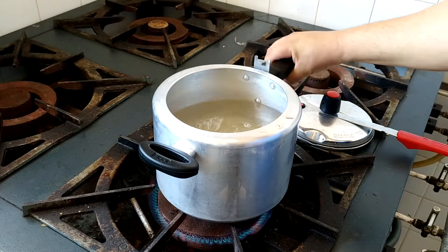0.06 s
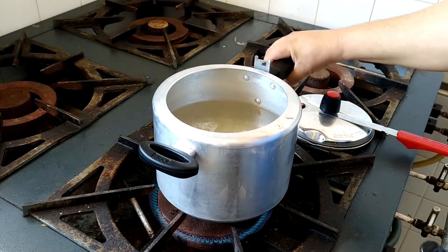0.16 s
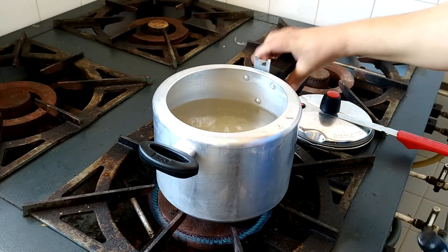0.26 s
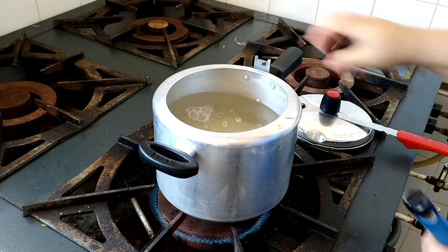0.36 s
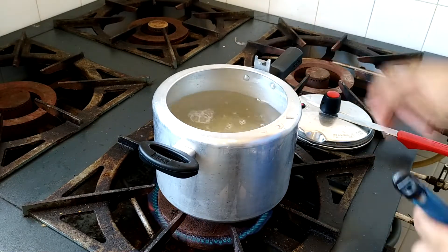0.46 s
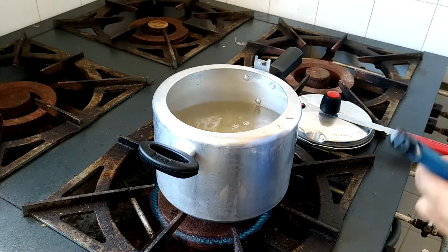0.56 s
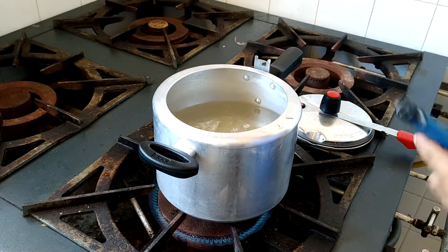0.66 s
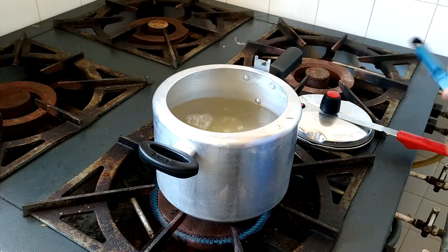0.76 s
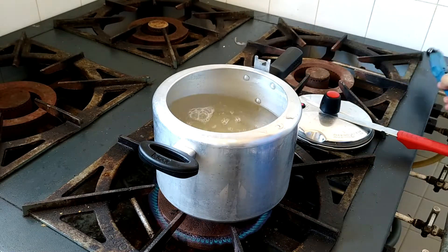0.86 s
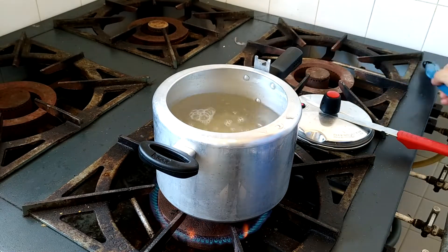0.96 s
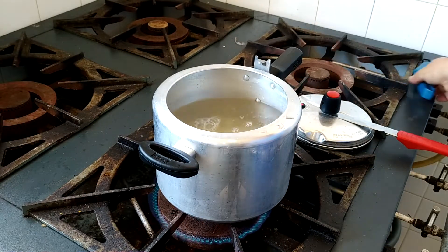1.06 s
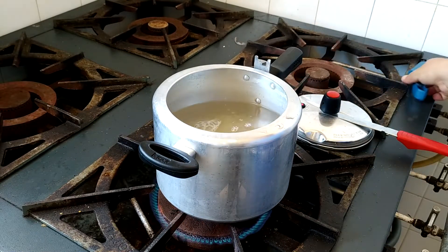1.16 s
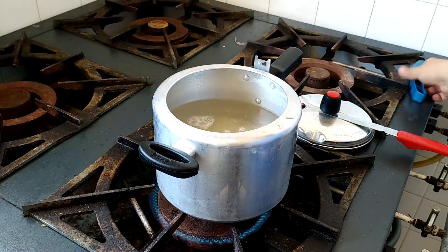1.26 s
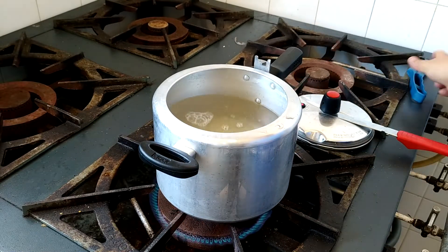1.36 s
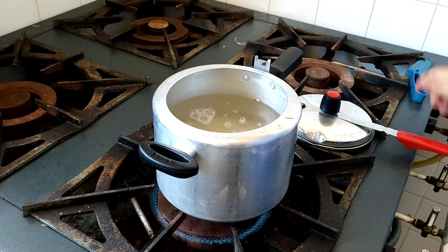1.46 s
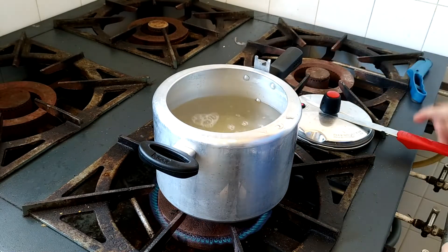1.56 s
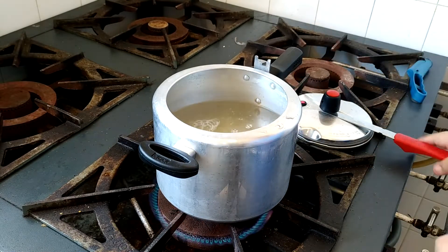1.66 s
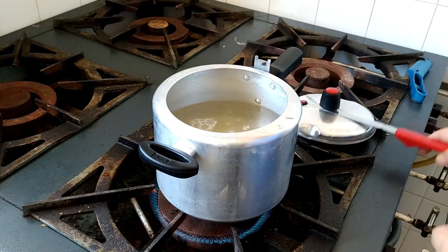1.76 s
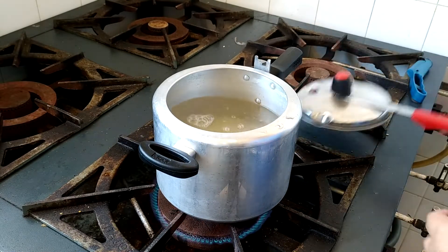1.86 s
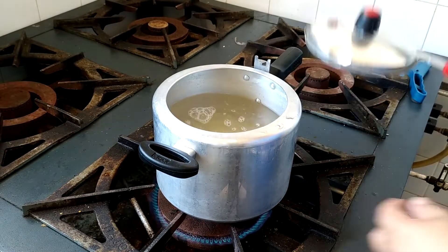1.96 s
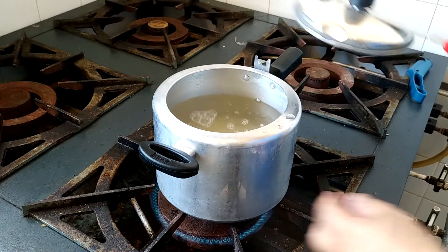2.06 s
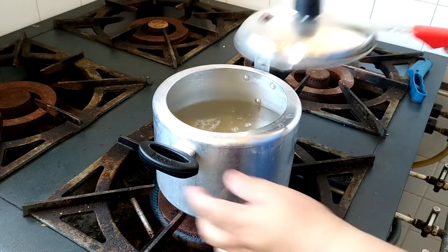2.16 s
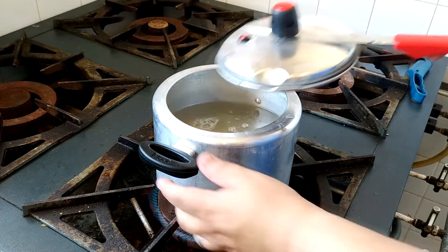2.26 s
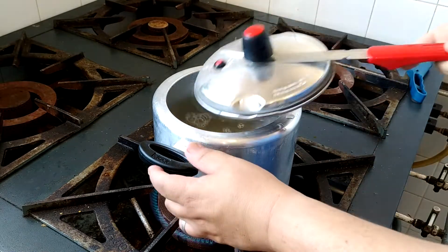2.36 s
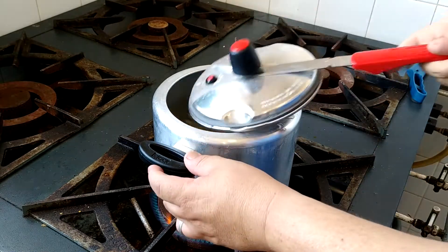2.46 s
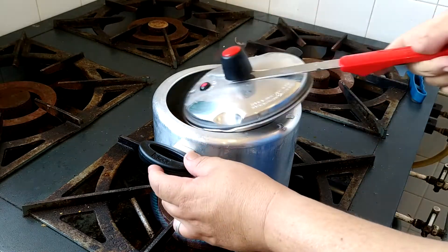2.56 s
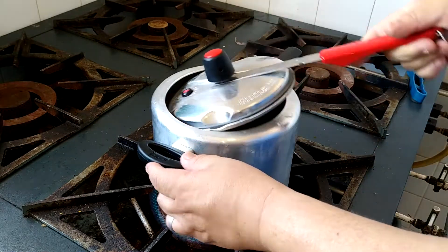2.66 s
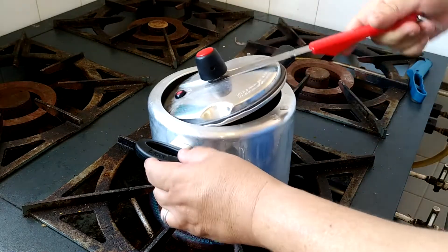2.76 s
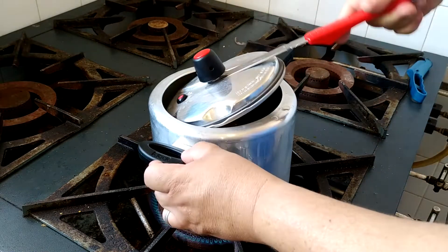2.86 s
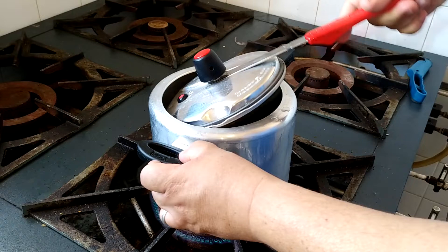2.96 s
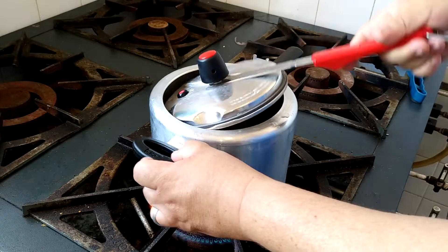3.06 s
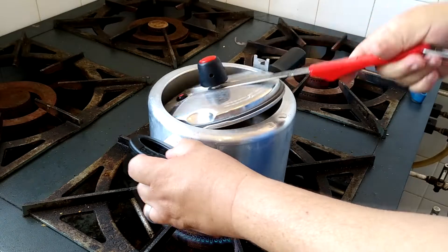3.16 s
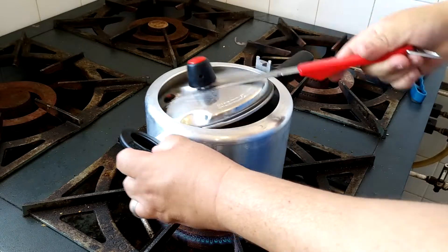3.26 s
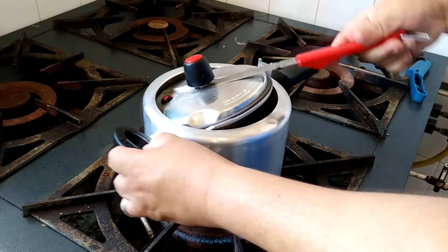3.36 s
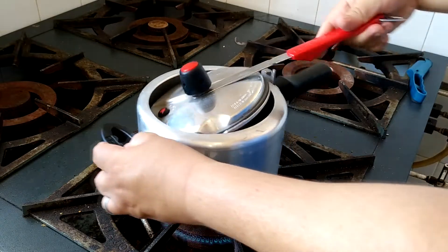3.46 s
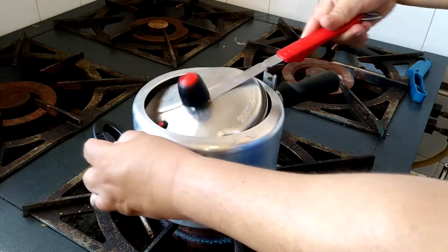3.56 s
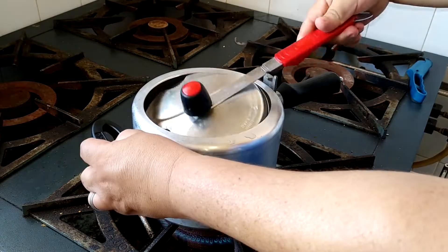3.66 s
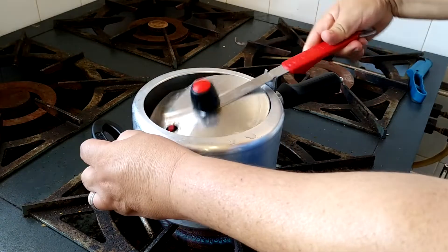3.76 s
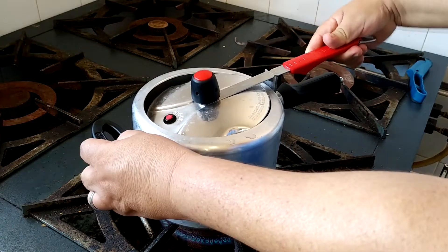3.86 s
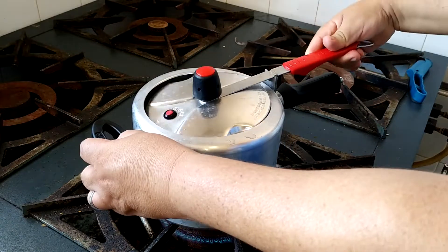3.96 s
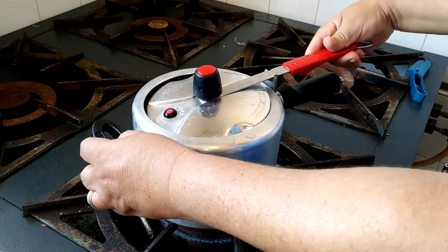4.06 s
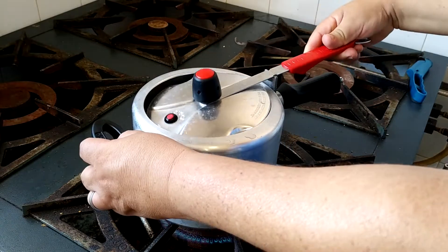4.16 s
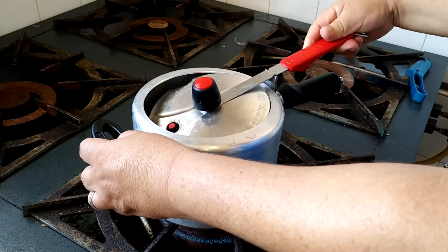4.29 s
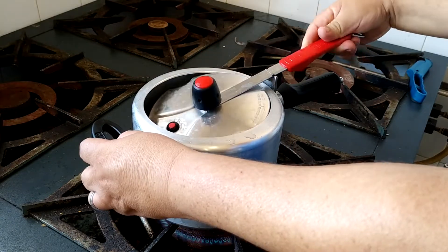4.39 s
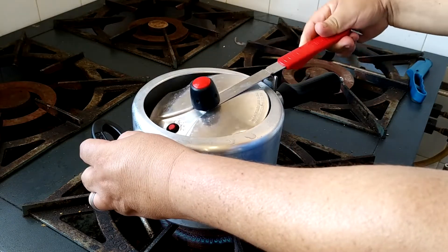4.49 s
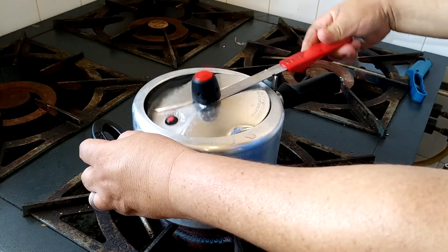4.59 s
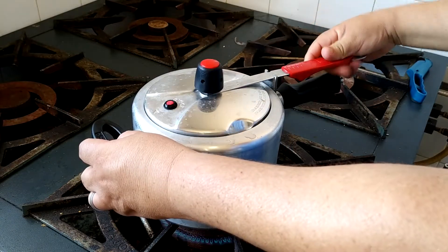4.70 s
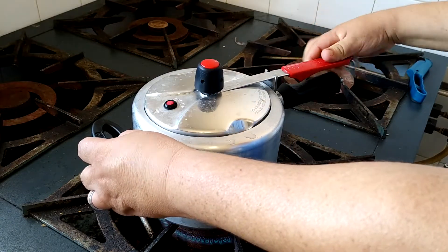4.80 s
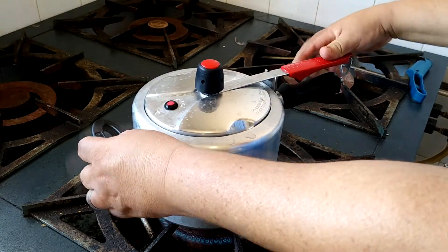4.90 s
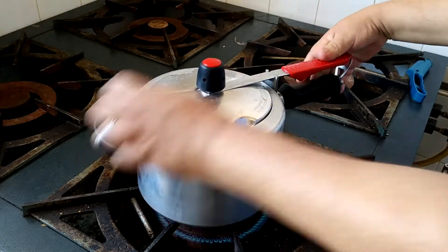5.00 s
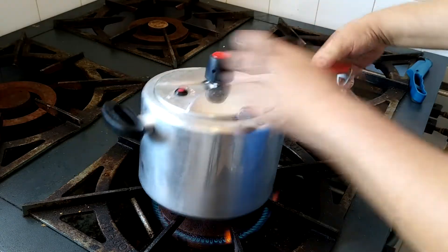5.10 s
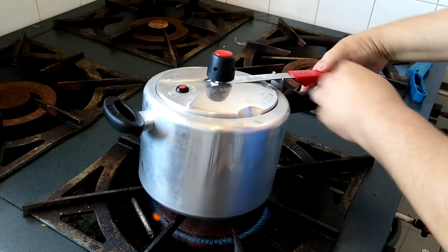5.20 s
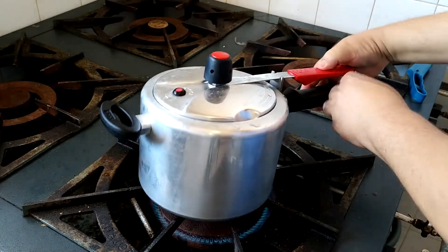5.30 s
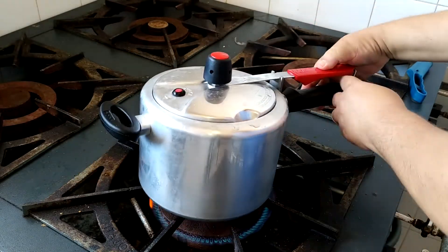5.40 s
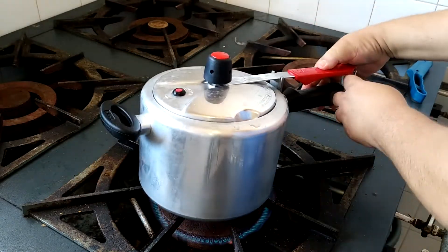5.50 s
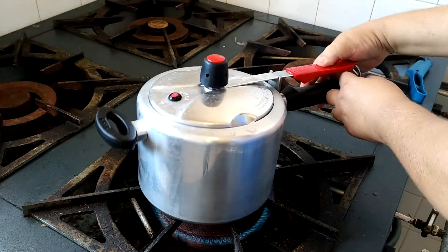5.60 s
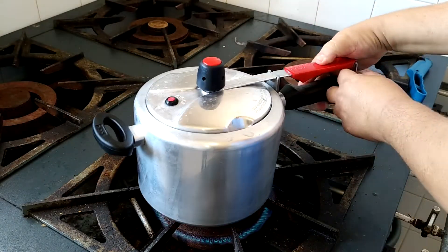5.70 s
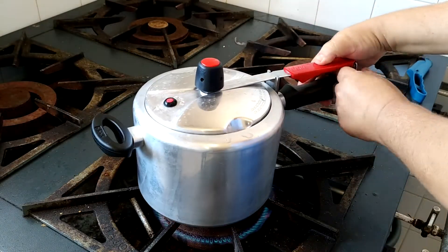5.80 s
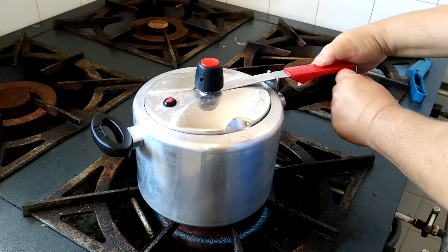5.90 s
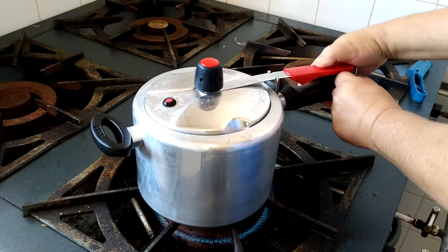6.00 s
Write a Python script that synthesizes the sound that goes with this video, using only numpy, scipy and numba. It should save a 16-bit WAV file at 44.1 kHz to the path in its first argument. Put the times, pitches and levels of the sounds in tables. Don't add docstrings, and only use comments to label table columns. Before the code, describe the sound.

Metal pressure cooker lid clanks and grates against its pot rim, drops into place and is latched, over soft flame hiss in an echoing kitchen.

```python
import sys
import numpy as np
from scipy import signal
from scipy.io import wavfile
from numba import njit

SR = 44100
rng = np.random.default_rng(int(sys.argv[2]) if len(sys.argv) > 2 else 0)


def digitize_waveform(pressure):
    field = np.atleast_2d(pressure).T
    bounded = np.clip(field, -1, 1)
    quanta = np.round(bounded * 32767).astype(np.int16)
    wavfile.write(sys.argv[1], SR, quanta)


def natural_amplitude(level_db):
    exponent = np.asarray(level_db, float) / 20
    return 10 ** exponent


N = 266364


def unit(x):
    return x / np.sqrt(np.mean(x ** 2) + 1e-20)


def in_time(rows):
    s, *columns = np.transpose(rows)
    return np.array([np.interp(np.arange(N) / SR, s, c) for c in columns])


def at_hz(points, hz):
    points_hz, values = np.transpose(points)
    return np.interp(np.log(hz), np.log(points_hz), values)


def band(x, low_hz, high_hz):
    return signal.sosfilt(signal.butter(2, [low_hz, high_hz], "band", fs=SR, output="sos"), x)


def drift(rate_hz):
    r = np.exp(-80 * np.pi * rate_hz / SR)
    noise = rng.standard_normal(N // 40 + 2002)
    slow = signal.lfilter([1], [1, -2 * r, r * r], noise)[2000:]
    return np.interp(np.arange(N) / 40, np.arange(len(slow)), unit(slow))


def noise_bands(size):
    # pitch_hz, likeness (0 to 1)
    likeness = [(30, 0.97), (100, 0.84), (250, 0.97), (500, 0.66), (1000, 0), (4000, 0.16), (15000, 0)]
    edges = 20 * 2 ** np.arange(0, 10, .5)
    white = rng.standard_normal((2, 2, size))
    for k, (low, high) in enumerate(zip(edges, edges[1:])):
        hz = np.sqrt(low * high)
        mid, side = band(white[k % 2], low, high)
        alike = np.clip(at_hz(likeness, hz), -1, 1)
        yield hz, np.sqrt(1 + alike) * mid + np.sqrt(1 - alike) * side * [[1], [-1]]


def slide_force(start_s, length_s, level_db, ease_db, weight_db, grain_db=3.0):
    t = np.arange(N) / SR
    clicks = (rng.random(N) < 2500 / SR) * natural_amplitude(grain_db * np.minimum(rng.exponential(1, N), 4))
    clicks = clicks * rng.choice([-1, 1], N)
    edge_s = 0.045
    stroke = np.clip(np.minimum(t - start_s, start_s + length_s - t) / edge_s, 0, 1)
    easing_db = ease_db * np.clip((t - start_s) / length_s, 0, 1)
    stroke *= natural_amplitude(level_db - 28 - easing_db + 3.2 * drift(27))
    parts_db = np.array([[-1], [weight_db], [0], [-3]])
    return natural_amplitude(parts_db) * stroke * unit(clicks)


def contacts(hits, touch, slides=(), low_hz=(300, 600), upper_hz=(1720, 3500), lower_hz=(690, 2300)):
    force = np.full((4, N), 1e-18)
    *colour_db, contact_ms = touch
    age = np.arange(3000) / (max(contact_ms, .2) * SR / 1000)
    swell = np.exp(-age) * (1 - np.exp(-6 * age))
    for start_s, level_db, hard_db, weight_db in hits:
        at = round(start_s * SR)
        burst = rng.standard_normal(3000) * swell
        burst = (burst / np.linalg.norm(burst))[:N - at]
        parts_db = np.array([level_db + hard_db / 2, weight_db, level_db - hard_db, level_db + hard_db])
        force[:, at:at + 3000] += natural_amplitude(parts_db + colour_db)[:, None] * burst
    for slide in slides:
        force += slide_force(*slide)
    upper = natural_amplitude(14) * band(force[0], *upper_hz)
    low = natural_amplitude(16) * band(band(force[1], *low_hz), *low_hz)
    lower = natural_amplitude(14.5) * band(force[2], *lower_hz)
    high = natural_amplitude(8) * band(force[3], 5530, 21000)
    return upper, low, lower, high


def struck(force, modes, ring_db, crack_db):
    busy = np.flatnonzero(np.abs(force) > 1e-9)
    part = slice(busy[0], busy[-1] + SR // 2)
    out = natural_amplitude(crack_db) * np.array([np.roll(force, 1), force])
    for hz, level_db, t60_s in modes:
        r, w = natural_amplitude(-60 / (t60_s * SR)), 2 * np.pi * hz / SR
        spot = natural_amplitude(2.5 * rng.standard_normal(N // 1024 + 1)).repeat(1024)[:N]
        rung = signal.lfilter([0, np.sin(w)], [1, -2 * r * np.cos(w), r * r], (force * spot)[part])
        aim = rng.uniform(.3, 1.27)
        out[:, part] += natural_amplitude(level_db + ring_db + 3) * rung * [[np.sin(aim)], [np.cos(aim)]]
    return out


@njit
def gliding(x, w, r):
    y = np.zeros(len(x))
    for i in range(2, len(x)):
        y[i] = np.sin(w[i]) * x[i - 1] + 2 * r[i] * np.cos(w[i]) * y[i - 1] - r[i] ** 2 * y[i - 2]
    return y


def lid_on_rim():
    # start_s, level_db, hardness_db, weight_db
    rim_hits = [(2.689, -15, 1.5, -35.5), (2.747, -7.5, -0.5, -14.5), (2.863, -27, 0, -54),
                (2.938, -14.5, 3.5, -29.5), (2.989, -18.5, -2, -37), (3.057, -18.5, -1, -25),
                (3.277, -30.5, -4, -34.5), (3.327, -21, -2.5, -25.5), (3.334, -17.5, -4.5, -35),
                (3.483, -14, 2, -31), (3.521, -10.5, -2.5, -29.5), (3.609, -12, 1, -40),
                (3.648, -24.5, -6.5, -26), (3.793, -17.5, -1, -46), (3.828, -42, -10, -43)]
    # start_s, length_s, level_db, ease_db, weight_db
    rim_slides = [
        (2.76, 0.35, -31, 8, -3),
        (3.489, 0.19, -29, 6.5, -1.5),
        (3.691, 0.17, -33, 14.6, -1),
    ]
    # upper_db, low_db, lower_db, high_db, contact_ms
    rim_touch = (-12, -4, -11.5, -8.5, 2.5)
    # pitch_hz, level_db, t60_s
    tilted_lid = [(705, 1, .12), (750, -8, .1), (930, -2, .05), (1254, -2, .07), (1790, -10, .06),
                  (1990, -12, .06), (2700, -1, .05), (2910, -8, .05), (3887, -10, .04), (4608, -10, .04)]
    upper, low, lower, high = contacts(rim_hits, rim_touch, rim_slides, low_hz=(260, 620))
    force = upper + lower + high + natural_amplitude(-18.5) * low
    return struck(force, tilted_lid, ring_db=-28, crack_db=19.0), low


def lid_seating():
    # start_s, level_db, hardness_db, weight_db
    seat_hits = [(3.973, -10, 2, -21.5), (3.992, -3.5, 0.5, -17.5), (4.005, -16, -2, -27.5),
                 (4.02, -21, 3, -28), (4.819, -11.5, 0, -28), (4.848, -24.5, 3, -31), (4.894, -19, -2, -30),
                 (4.919, -34, -1.5, -23), (4.934, -18, 4, -27.5)]
    # start_s, length_s, level_db, ease_db, weight_db
    seat_slides = [
        (3.978, 0.095, -26.5, 5.2, -9.5),
        (4.828, 0.182, -37.5, 12, -4),
    ]
    # upper_db, low_db, lower_db, high_db, contact_ms
    seat_touch = (-6.5, -8.5, -6.5, -5, 2.5)
    # pitch_hz, level_db, t60_s
    seated_lid = [(721, -8, .06), (840, -6, .06), (1110, -6, .07), (1480, -8, .07), (1583, -7, .07),
                  (1930, -1, .12), (2700, -12, .04), (2961, -5, .05), (3828, -12, .04), (4635, -12, .04)]
    upper, low, lower, high = contacts(seat_hits, seat_touch, seat_slides, low_hz=(190, 680), lower_hz=(1000, 2200))
    force = upper + lower + high + natural_amplitude(-18.5) * low
    return struck(force, seated_lid, ring_db=-39, crack_db=12.5), low


def pot_air(low_force):
    # time_s, pitch_hz, t60_s
    cavity = [(2.6, 500, .1), (3.35, 510, .1), (3.96, 462, .3), (3.98, 372, .085), (4.19, 372, .09),
              (4.2, 347, .13), (4.885, 345, .11), (4.895, 225, .06)]
    # start_s, level_db
    pot_knocks = [
        (4.206, -17),
        (4.252, -29),
        (4.845, -17),
    ]
    hz, t60_s = in_time(cavity)
    hz = hz * (1 + .015 * drift(13.4))
    r, taps = natural_amplitude(-60 / (t60_s * SR)), np.zeros(N)
    for start_s, level_db in pot_knocks:
        taps[round(start_s * SR)] = natural_amplitude(level_db)
    force = low_force + band(taps, 290, 740)
    air = gliding(force, 2 * np.pi * hz / SR, r)
    wall = gliding(force, 2 * np.pi * 1.08 * hz / SR, r)
    return natural_amplitude(-10) * (air + natural_amplitude(-7.5) * wall) * natural_amplitude(np.array([[1.2], [-1.2]]))


def lid_clank():
    # start_s, level_db, hardness_db, weight_db
    clank_hits = [
        (2.6895, -13, -1.5, -31),
        (2.7475, -15, -0.72, -46),
        (4.895, -28.5, -0.8, -56),
        (3.993, -24, -1.5, -24),
    ]
    # upper_db, low_db, lower_db, high_db, contact_ms
    clank_touch = (-18, -1.5, -8, -21, 0.33)
    # pitch_hz, level_db, t60_s
    pot_wall = [(800, 0, .04), (960, -6, .04), (1130, -5, .04), (1265, -5, .04)]
    return struck(sum(contacts(clank_hits, clank_touch, low_hz=(550, 900))), pot_wall, ring_db=-9.5, crack_db=4)


def lid_lifted():
    # start_s, level_db, hardness_db, weight_db
    lift_hits = [(1.819, -31, 9, -56), (1.831, -21.5, 1, -65), (1.885, -11.5, 2.5, -49),
                 (1.903, -22, -11, -10.5), (1.953, -42, -7, -49), (2.136, -35, 11, -65),
                 (2.148, -23, 4, -60), (2.298, -38, 3.5, -62), (2.307, -26, 9.5, -58.5),
                 (2.328, -37.5, -8, -59)]
    # upper_db, low_db, lower_db, high_db, contact_ms
    lift_touch = (-8.5, -8.5, -8.5, -10, 2)
    # pitch_hz, level_db, t60_s
    free_lid = [(1018, -4, .06), (1161, -6, .06), (1391, -8, .06), (1690, -5, .07), (1730, -6, .07),
                (2237, -9, .05), (2775, -9, .05)]
    return struck(sum(contacts(lift_hits, lift_touch)), free_lid, ring_db=-29.5, crack_db=11.5)


def lid_nudged():
    # start_s, level_db, hardness_db, weight_db
    nudge_hits = [(4.407, -39.5, 0.0065, -49), (4.435, -42, 0.0059, -48.5), (4.535, -40, 0, -45),
                  (4.569, -44, 0.0039, -43), (4.644, -36, 0, -41.5), (4.732, -41, 0, -42.5),
                  (4.785, -37, 0, -38.5)]
    # upper_db, low_db, lower_db, high_db, contact_ms
    nudge_touch = (-3, 4.5, -20, -26, 4.5)
    # pitch_hz, level_db, t60_s
    loose_lid = [(500, -10, .025), (600, -9, .025), (1450, -7, .025), (1680, -3, .035), (2500, -13, .02),
                 (2800, -10, .025)]
    force = sum(contacts(nudge_hits, nudge_touch, low_hz=(380, 750), upper_hz=(1300, 2900)))
    return natural_amplitude(3) * struck(force, loose_lid, ring_db=-14, crack_db=9)


def lighter_on_stove():
    # start_s, level_db, hardness_db, weight_db
    stove_hits = [
        (1.132, -0.5, 4, -40),
        (1.15, -8, 0.5, -22),
        (1.171, -10, 5.5, -32),
        (1.188, -6.5, 5, -42),
    ]
    # start_s, length_s, level_db, ease_db, weight_db
    stove_slides = [
        (1.346, .1, -34.5, 4, -5.5),
        (1.423, .2, -32, 14.5, -6),
    ]
    # upper_db, low_db, lower_db, high_db, contact_ms
    stove_touch = (-10, -1.5, -10, -8.5, 5.5)
    # pitch_hz, level_db, t60_s
    stove_modes = [(590, -6, .2), (830, -11, .2), (940, -6, .15), (1015, 0, .35), (1225, -9, .18),
                   (1430, -5, .15), (1600, -6, .15), (1780, -8, .15), (1945, -3, .12), (2250, -10, .1),
                   (2975, -7, .1), (7768, -12, .12), (8834, -8, .12), (8980, -9, .12), (14200, 0, .15)]
    force = sum(contacts(stove_hits, stove_touch, stove_slides, low_hz=(400, 750)))
    return struck(force, stove_modes, ring_db=-21.5, crack_db=15.5)


def hook():
    # start_s, level_db, hardness_db, weight_db
    hook_hits = [(4.9634, -35, -3, -59), (5.0438, -23, 1, -28), (5.0742, -36, -14, -41),
                 (5.118, -29, -5.5, -53), (5.233, -27, -5.5, -49), (5.312, -33, -7, -54),
                 (5.3335, -26, -9, -55)]
    # upper_db, low_db (drives the wire), lower_db, high_db, contact_ms
    hook_touch = (-11.5, 12, -32, -0.5, 4)
    # pitch_hz, level_db, t60_s
    hook_modes = [(2900, -8, .012), (3876, -18, .025), (5260, -13, .5), (5300, -13, .35), (6681, -20, .06)]
    # pitch_hz, level_db, t60_s
    hook_wire = [(13105, 3, .35), (13040, -9, .3), (14556, -10, .3)]
    upper, wire, lower, high = contacts(hook_hits, hook_touch, low_hz=(12500, 15500), upper_hz=(2300, 4200))
    body = struck(upper + lower + high, hook_modes, ring_db=-9, crack_db=17.0)
    return body + struck(wire, hook_wire, ring_db=1.5, crack_db=33) * natural_amplitude(np.array([[3], [-3]]))


def latch():
    # start_s, level_db, hardness_db, weight_db
    latch_hits = [
        (5.675, -40.5, -1.5, -75),
        (5.7156, -32.5, 1.1, -66),
        (5.7556, -29, 1.3, -45),
    ]
    # upper_db, low_db (drives the wire), lower_db, high_db, contact_ms
    latch_touch = (-12, 7, -28, -7.5, 2)
    # pitch_hz, level_db, t60_s
    latch_modes = [(2711, -5, .015), (2900, -5, .015)]
    # pitch_hz, level_db, t60_s
    latch_wire = [(13040, -4, .25)]
    upper, wire, lower, high = contacts(latch_hits, latch_touch, low_hz=(12500, 15500), upper_hz=(2300, 3400))
    body = struck(upper + lower + high, latch_modes, ring_db=-6, crack_db=18.5)
    return body + struck(wire, latch_wire, ring_db=9.0, crack_db=20)


def pot_on_grate():
    # start_s, level_db, hardness_db, weight_db
    grate_hits = [(3.407, -39.5, -1, -47), (4.901, -23.5, 1, -32.5), (5.371, -39, 7, -37),
                  (5.381, -32, 3, -32), (5.954, -36.5, -3, -53.5), (5.963, -37.5, -4.5, -47.5)]
    # start_s, length_s, level_db, ease_db, weight_db
    grate_slides = [
        (2.72, 0.78, -69.5, 2.5, 21.5),
        (3.47, 0.79, -69.5, 6.8, 21.8),
    ]
    # upper_db, low_db, lower_db, high_db, contact_ms
    grate_touch = (-10.5, 4.5, -5.5, -11, 12.5)
    # pitch_hz, level_db, t60_s
    grate_modes = [(120, -12, 0.08), (174.4, -8, 0.1), (219, -3, 0.1), (284, 2.5, 0.063), (400, -3, 0.11)]
    force = sum(contacts(grate_hits, grate_touch, grate_slides, low_hz=(110, 600)))
    return struck(force, grate_modes, ring_db=-27.5, crack_db=18.5)


def kitchen(x):
    # pitch_hz, t60_s
    room_t60 = [(100, 0.9), (500, 1), (2000, 0.78), (5000, 0.72), (10000, 0.47), (15000, 0.077)]
    t = np.arange(round(1.2 * SR)) / SR
    near = natural_amplitude(4.0) * natural_amplitude(-60 * t / 0.31)
    tail = sum(noise * (natural_amplitude(-60 * t / at_hz(room_t60, hz)) + near) for hz, noise in noise_bands(len(t)))
    tail *= 1 - np.exp(-np.maximum(t - .002, 0) / 0.00098)
    return signal.fftconvolve(x[None], tail / np.linalg.norm(tail[0]), axes=1)[:, :N]


def background():
    # pitch_hz, level_db (per Hz)
    room_tone = [(13, -42), (22, -12.5), (64, -14.5), (136, -12.5), (169, -2.5), (194, -10.5), (347, -18),
                 (432, -14), (653, -24), (730, -27.5), (988, -25), (2320, -30), (3610, -29), (9480, -27.5),
                 (16000, -12)]
    # start_s, length_s, pitch_hz, level_db
    hum_swells = [(-.1, 0.53, 54.6, -47), (0.453, 1, 60, -49), (1.38, 0.64, 62, -52),
                  (2.846, 0.51, 60, -52), (4.743, 0.27, 61.7, -48), (5.147, 0.36, 55, -50)]
    t, bands = np.arange(N) / SR, list(noise_bands(N))
    tone = unit(sum(natural_amplitude(at_hz(room_tone, hz) + 1.0 * drift(20)) * noise for hz, noise in bands))
    hum = np.zeros(N)
    for start_s, length_s, hz, level_db in hum_swells:
        swell = np.sin(np.pi * np.clip((t - start_s) / length_s, 0, 1)) ** .5
        hum += natural_amplitude(level_db - 4.5) * swell * np.sin(2 * np.pi * hz * t)
    clatter = unit(sum(noise * 500 / hz for hz, noise in bands if 400 < hz < 3000))
    fading = natural_amplitude(-47.5 - 60 * t / 0.48) * clatter
    return natural_amplitude(-53 + 5) * tone + hum * natural_amplitude(2.5 * drift(2.3)) + fading


def scene():
    rim, rim_low = lid_on_rim()
    seat, seat_low = lid_seating()
    inside = pot_air(rim_low + seat_low) + lid_nudged()
    metal = rim + seat + lid_clank() + lid_lifted()
    metal += lighter_on_stove() + hook() + latch() + pot_on_grate()
    room_feed = metal[1] + natural_amplitude(-7) * inside[1]
    return metal + inside + natural_amplitude(4) * kitchen(room_feed) + background()


def low_pass(x):
    return signal.sosfilt(signal.butter(12, 16470, fs=SR, output="sos"), x)


def record(dry):
    peak_hz, width_hz, peak_db = 9210, 2100, 2.5
    top_hz, leak_db, overload = 10340, -22.5, .97
    peak = band(dry, peak_hz - width_hz / 2, peak_hz + width_hz / 2)
    x = dry + (natural_amplitude(peak_db) - 1) * peak
    x = signal.sosfilt(signal.butter(8, top_hz, fs=SR, output="sos"), x) + natural_amplitude(leak_db) * x
    x = overload * np.tanh(x / overload)
    mix = signal.sosfilt(signal.cheby2(12, 70, 16400, fs=SR, output="sos"), x)
    return low_pass(mix)


dry = scene()
out = record(dry)
digitize_waveform(out)
```